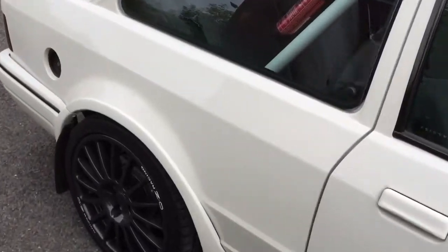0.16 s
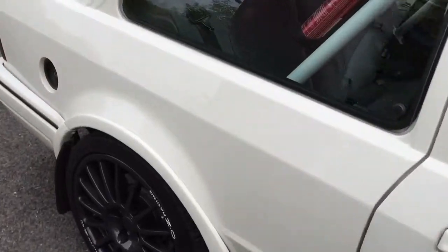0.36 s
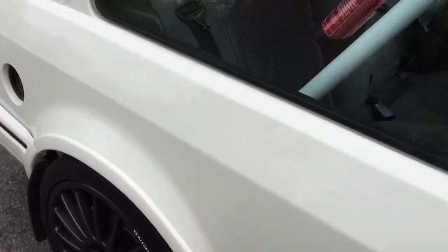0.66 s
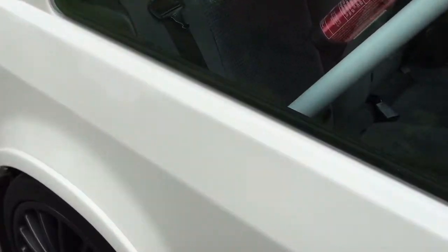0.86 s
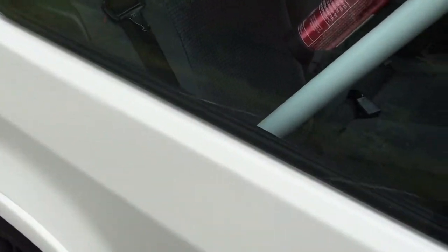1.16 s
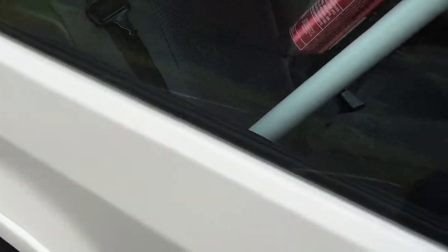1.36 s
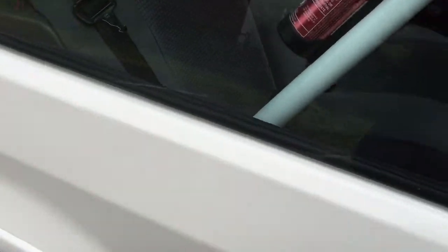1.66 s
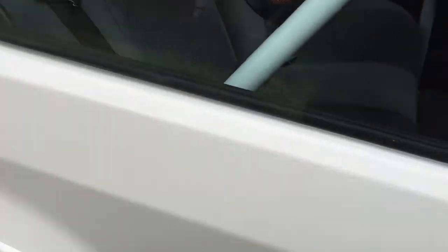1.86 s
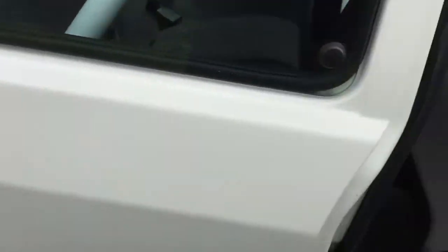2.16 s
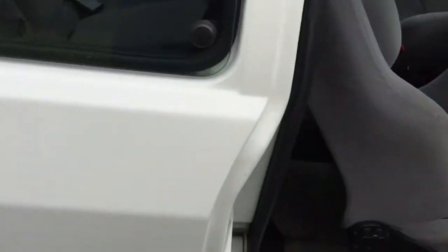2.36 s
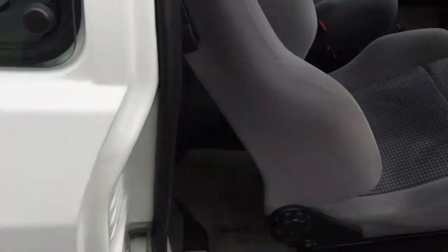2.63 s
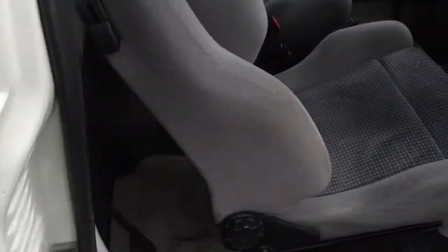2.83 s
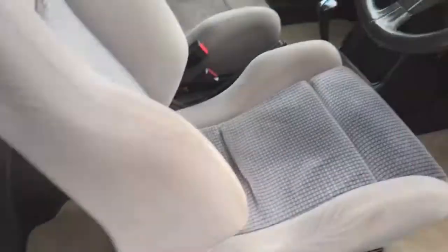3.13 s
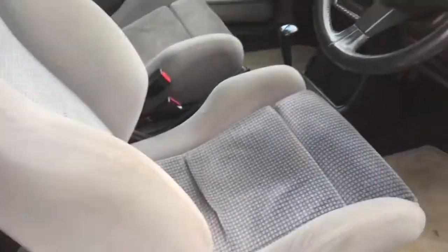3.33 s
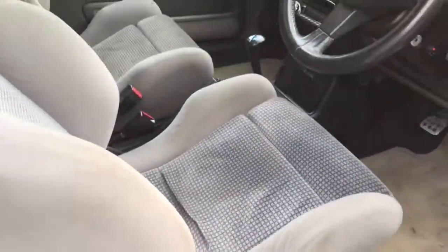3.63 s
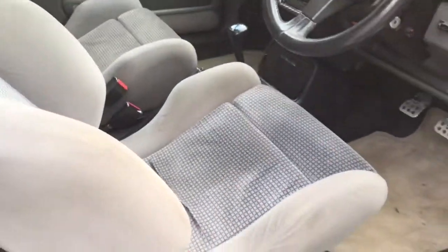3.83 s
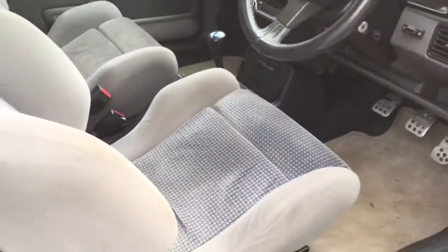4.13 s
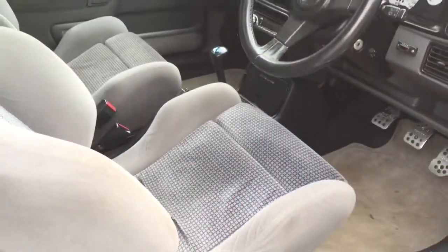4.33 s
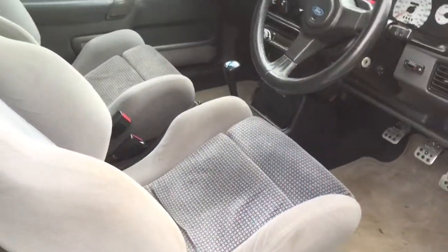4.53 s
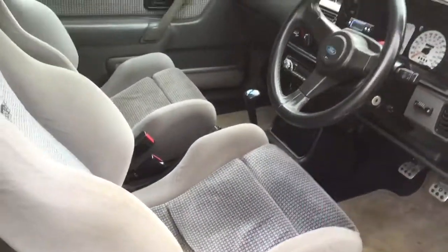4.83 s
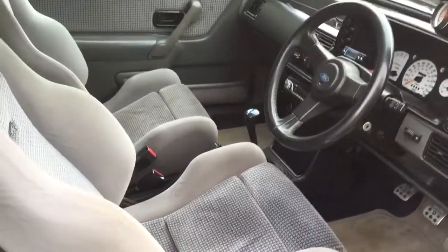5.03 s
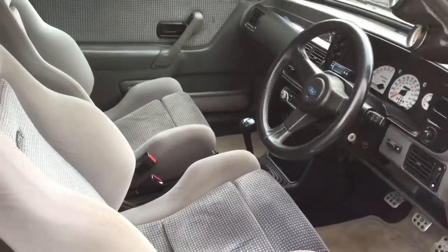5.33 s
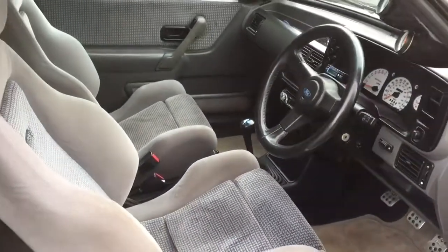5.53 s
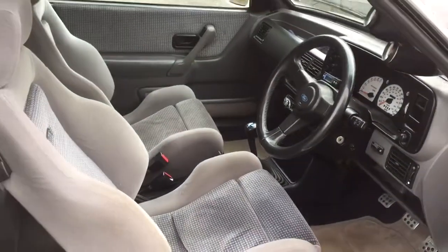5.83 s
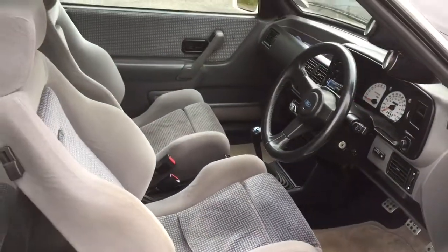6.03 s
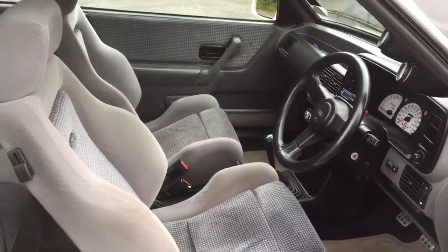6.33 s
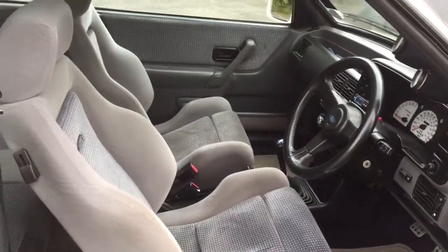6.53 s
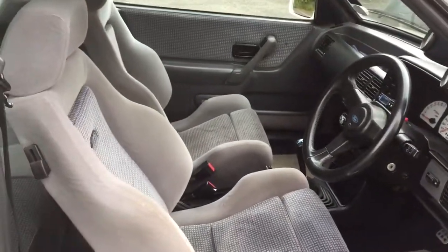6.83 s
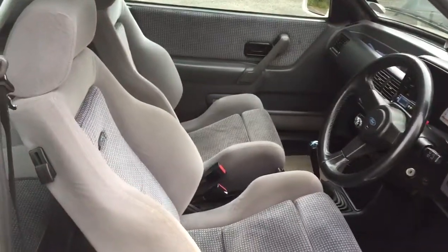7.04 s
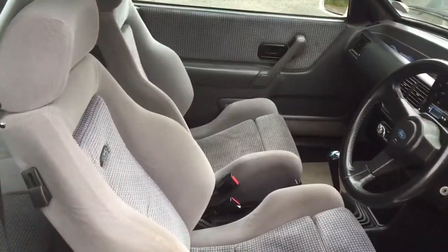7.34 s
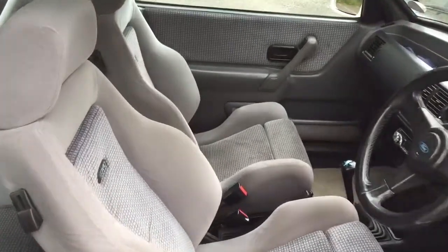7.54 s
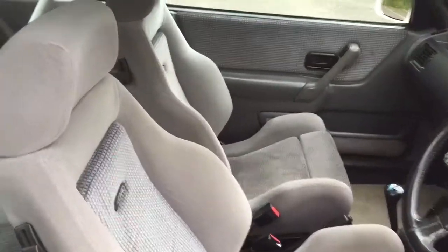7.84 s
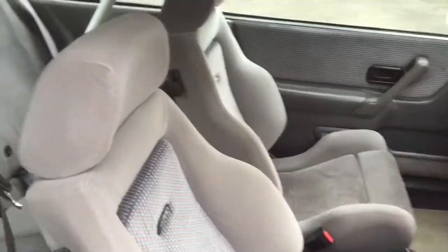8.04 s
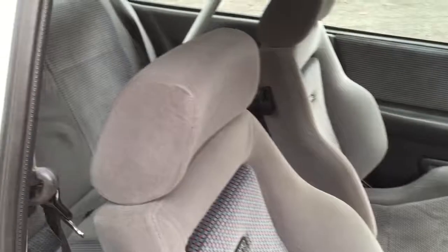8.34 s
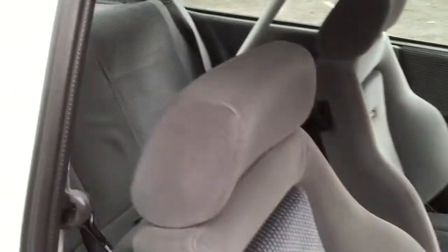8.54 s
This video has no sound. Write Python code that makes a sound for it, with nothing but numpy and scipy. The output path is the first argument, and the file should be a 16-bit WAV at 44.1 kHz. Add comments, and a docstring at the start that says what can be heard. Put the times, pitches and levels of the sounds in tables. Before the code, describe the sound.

A close hand-held phone outdoors, dry, with faint far traffic rumble and a low wavering hum that is strongest near the start. From 0.2 to 0.8 s soft footsteps thud and crunch on gritty tarmac, with dry grain snaps until 1.1 s and a light cloth rustle. At 1.1 s the car door handle clunks and rubs; from 1.2 to 1.5 s steel latch clicks come fast, with hollow door booms, rattle, tiny squeaks and a low air swell. Around 1.9 to 2.1 s a sole scrapes and pebbles knock hard; grit crunches at 2.7. A heavy footfall thuds at 3.0, another scuffs at 3.5, as a sleeve hisses faintly. From 4.3 to 4.65 s a longer gritty scrape ends in a juddering slip. Strong dull thuds fall at 5.2 to 5.4 s. A soft step follows at 6.2, grit and a pebble knock at 7.5, then stone ticks and two footfalls at 8.3 and 8.5 s.

```python
"""A car parked on gritty tarmac in the open, heard close by on a hand-held phone over far traffic and a low hum.
First someone walks up: shoes thud, slap and crunch as grains of grit snap.
Then the handle is lifted and rubs, the latch's steel parts snap, and the door springs free, booming and rattling.
Next the feet step round the open door: soles scuff, judder and crush grit, pebbles knock, a sleeve slides.
Last come a few more footfalls and small stones ticking. Noise bursts, damped modes and filters make it all."""
import sys
import numpy as np
from scipy import signal
from scipy.fft import rfft, irfft
from scipy.io import wavfile
from scipy.ndimage import uniform_filter1d

SR = 44100
rng = np.random.default_rng(int(sys.argv[2]) if len(sys.argv) > 2 else 0)


def file_out(sig):
    """Save sig as 16-bit WAV at sys.argv[1]."""
    # one column per channel
    cols = np.atleast_2d(sig).T
    # limit, then scale
    lim = np.clip(cols, -1, 1)
    pcm = np.round(lim * 32767).astype(np.int16)
    wavfile.write(sys.argv[1], SR, pcm)


N = 383273
TIME = np.arange(N) / SR
AGE = np.arange(SR // 2) / SR  # seconds since a blow

# far traffic: time_s, rumble_db, tyre_wash_db
TRAFFIC = [(0, -41, -45), (1.1, -42, -44), (2.4, -42, -46.5), (4.2, -43.5, -49.5), (6.1, -42, -47.5),
           (7.7, -46.5, -48), (8.69, -45, -46.5)]
# the rumble swells as door and body move near the phone: middle_s, length_s, level_db
BUFFETS = [(.92, 1, -42), (1.36, 0.33, -33), (1.58, 0.38, -38.5), (5.0, 0.14, -39.5), (5.33, 0.53, -36.5)]
# spectrum of the far air: frequency_hz, density_db_per_hz
AIR_COLOUR = [(15, -50), (25, -19), (37, -9), (59, 1.5), (87, 1.5), (117, -3.5), (174, -3.5), (236, -5),
              (277, -11.5), (359, -13), (438, -17), (832, -9), (1550, -14), (2130, -26.5), (3000, -40),
              (3900, -49), (6600, -120)]
# distant hum, before its random waver: time_s, level_db
HUM = [(0, -45), (1.3, -41), (2.5, -61), (6, -51.5), (8.69, -51)]
# clothing rustles with each move: middle_s, length_s, level_db
RUSTLES = [(.7, 0.58, -59), (.985, 0.094, -52), (1.17, 0.24, -53), (1.41, .2, -58.5), (5.36, 0.35, -63.5),
           (5.85, 0.48, -66), (7.12, 0.068, -54.5)]
# spectrum of rubbed clothing: frequency_hz, density_db_per_hz
CLOTH_COLOUR = [(1180, -32), (2000, -5.5), (3120, -12), (3650, -12), (4820, -17.5), (5350, -18),
                (9740, -24.5), (14000, -27.5), (16000, -31)]
# a sleeve slides as the arm reaches forward: middle_s, length_s, level_db
SLIDES = [(3.2, 0.74, -66), (3.6, 0.87, -71)]
# spectrum of the sleeve: frequency_hz, density_db_per_hz
SLEEVE_COLOUR = [(2000, -14), (3300, -2.5), (5000, -3), (6400, -5.5), (7800, -18), (9600, -13),
                 (11500, -24), (15000, -21)]
# small stones ticking against each other: start_s, level_db, pitch_hz
TICKS = [(.39, -57, 3700), (2.847, -58, 3150), (3.39, -63, 5600), (3.8262, -58, 2420), (4.728, -52, 2260),
         (7.409, -59, 2850), (7.543, -53, 4540), (8.0832, -56, 3370), (8.092, -54, 3320),
         (8.2561, -49, 2520)]
# dull bumps as the door swings and weight shifts: start_s, level_db, starting_pitch_hz, t60_s
BUMPS = [(1.242, -37, 194, 0.069), (1.566, -36, 147, 0.092), (5.24, -30, 213, 0.08), (5.287, -33, 175, .06),
         (5.319, -31.5, 135, .11), (5.433, -37, 139, 0.096)]
# lone grains splitting with one dry snap: start_s, level_db, pitch_hz
SNAPS = [(0.6157, -38.5, 4630), (0.7671, -41, 4370), (0.7822, -44.5, 2520), (0.7909, -41.5, 3880),
         (.9629, -41.5, 3980), (1.1291, -40, 3600), (1.1358, -50, 5500), (1.7254, -53.5, 2560)]
# pebbles knocking under a sole: start_s, knock_db, pitch_hz, t60_s
PEBBLES = [(1.944, -34.5, 1300, 0.016), (1.9852, -28.5, 1430, 0.007), (1.9912, -26.5, 1285, 0.012),
           (2.0135, -19, 1180, 0.005), (2.0257, -29, 1145, .02), (2.058, -36, 1720, .02),
           (2.072, -31, 1800, 0.024), (2.0989, -29, 1390, 0.0045), (2.6452, -43, 1540, 0.0047),
           (6.2496, -38.5, 1760, 0.0064), (7.5505, -25.5, 1280, 0.0034)]
# grit crushed under a sole: start_s, crush_db, pitch_hz, hiss_db
GRIT = [(0.7388, -44, 3320, -67), (1.6174, -48, 4380, -53.5), (1.8953, -41.5, 2390, -86),
        (1.955, -59, 4500, -50), (1.9675, -40.5, 3250, -53), (2.175, -80, 8900, -65),
        (2.6562, -41, 3130, -49), (2.7147, -36, 2930, -66), (2.7737, -42.5, 3120, -57),
        (3.4618, -49.5, 6060, -75), (3.473, -47.5, 3170, -63), (3.509, -47, 2830, -57),
        (4.3687, -44.5, 2840, -51.5), (4.3967, -39, 2750, -53), (4.4167, -40.5, 2710, -62),
        (4.4327, -44, 3080, -49), (4.4589, -53, 3600, -48.5), (4.482, -50, 2600, -55),
        (4.5075, -51, 2200, -56), (6.223, -44, 2550, -71), (7.4722, -57.5, 4500, -71),
        (7.492, -53, 4500, -65), (7.5003, -49, 2980, -55.5)]
# soles dragged over tarmac: start_s, build_up_s, hold_s, lift_s, scrape_db, grit_hiss_db, catch_db, catch_hz
SCUFFS = [(1.874, 0.14, 0.1, 0.04, -34, -38, -31.5, 1320),
          (3.525, 0.014, 0.011, 0.027, -41, -45.5, -31.5, 1340),
          (4.336, 0.074, 0.05, 0.19, -39.5, -45.5, -50.5, 2230),
          (4.46, 0.037, .04, .05, -45, -62, -51, 1300), (4.518, 0.074, 0.04, 0.028, -36.5, -37, -39, 1900),
          (5.176, 0.022, 0.029, 0.091, -33, -46.5, -40.5, 1240)]
# spectrum of a scuff: frequency_hz, density_db_per_hz
SCUFF_COLOUR = [(53, -37), (90, 1), (196, 4), (419, -12), (676, -11.5), (1270, -9.5), (1750, -18),
                (2090, -28), (3010, -15), (3590, -27), (4360, -24.5), (7660, -37.5), (15000, -38.5),
                (16000, -43)]
# modes of a dragged sole: frequency_hz, relative_level_db, t60_s
SCRAPE_RING = [(1490, 1, .05), (1716, -3, 0.089), (2280, 1, 0.032), (2944, 5, 0.017), (4520, -5, 0.021),
               (5590, -17, 0.018)]
# a sole sticks and slips at the end of its scrape: start_s, level_db
JUDDER = [(4.6074, -32), (4.6137, -26.5), (4.6178, -26), (4.6208, -37), (4.628, -32.5), (4.6362, -32)]
# footfalls: start_s, sole_slap_db, thud_db, crunch_db, toe_relative_to_heel_db, toe_lag_s,
# starting_thud_pitch_hz, load_t60_s
STEPS = [(.23, -49, -44, -47.5, -10.5, 0.068, 151, 0.086), (.374, -44.5, -60, -53, -15, .015, 167, 0.069),
         (.699, -63, -44, -41, -3, 0.031, 185, 0.1), (3.0253, -38.5, -26.5, -47.5, -12, 0.03, 199.4, 0.16),
         (3.538, -32.5, -40, -48, -2, 0.016, 330, 0.16), (3.745, -46.5, -47, -56, -17, .029, 217, 0.057),
         (4.543, -33.5, -29.5, -36, -1, 0.026, 209, 0.079),
         (5.2135, -39, -21.5, -47, -9.5, 0.022, 263, 0.085),
         (5.372, -52, -38.5, -55.5, -5, 0.022, 470, 0.068),
         (6.221, -55, -42.5, -43.5, -5, 0.027, 192, 0.07), (8.278, -44.5, -40.5, -64, -2, 0.07, 195, 0.24),
         (8.489, -38.5, -34.5, -63.5, -16, 0.021, 200, 0.12)]
# spectrum of a footfall: frequency_hz, density_db_per_hz
STEP_COLOUR = [(60, 3), (115, 11.5), (160, 1.5), (270, 3.5), (420, 0), (580, 0), (800, -10), (1350, -4.5),
               (2000, -14), (3000, -22), (5000, -35.5), (9000, -47.5), (16000, -59)]
# thin squeaks of handle pivot, latch spring and rubber sole: middle_s, length_s, level_db, pitch_hz
SQUEAKS = [(1.0948, .006, -34, 14700), (1.347, 0.0075, -28.5, 4100), (1.465, 0.016, -32, 5150),
           (4.598, .026, -38, 14600), (4.619, .014, -38, 13300)]
# the handle rubs in its recess, then the rubber seal peels away: middle_s, length_s, level_db
RUBS = [(1.115, 0.061, -34), (1.18, 0.057, -41), (1.415, 0.069, -58)]
# handle and latch blows: start_s, steel_db, door_skin_db, door_cavity_db, strongest_steel_hz,
# starting_boom_pitch_hz, rattle_t60_s
LATCH = [(1.0953, -38, -33.5, -30, 2630, 220, 0.13), (1.103, -40.5, -28.5, -35.5, 2630, 240, 0.3),
         (1.199, -24, -36.5, -30.5, 1900, 194, 0.021), (1.2084, -41, -34, -35.5, 2360, 211, 0.053),
         (1.2244, -35, -39.5, -41, 2180, 150, .032), (1.2354, -40.5, -53, -34, 3870, 190, 0.012),
         (1.3034, -33, -28.5, -23.5, 6000, 388, 0.014), (1.328, -37, -40, -39, 3180, 131, .045),
         (1.346, -35, -36, -28, 3920, 150, 0.047), (1.3527, -30, -22, -31, 2980, 710, 0.031),
         (1.377, -59, -57, -31, 2610, 438, .031), (1.4449, -25.5, -30, -34, 5600, 260, 0.033),
         (1.4564, -37, -35, -31, 3500, 203, 0.078), (1.478, -37, -40, -33.5, 2320, 187, 0.032)]
# modes of the steel latch parts: frequency_hz, relative_level_db, t60_s
STEEL = [(1572, 3.5, 0.096), (2410, 3, 0.039), (3294, 4.5, .04), (4030, 6.5, 0.041), (4370, 3.5, 0.023),
         (5190, -7, 0.028), (5940, 1, 0.023), (6470, 9, 0.013), (6900, 5, .02), (8700, -2, .02)]
# modes of door skin and cavity: frequency_hz, relative_level_db, t60_s
DOOR = [(184.6, 5.5, 0.12), (272, 0, 0.065), (366, -1, 0.31), (531, -2.5, 0.2), (614, 0, 0.17),
        (780, 0.5, 0.072), (937, 5.5, .07), (1160, -4, 0.044), (1315, 11, 0.035), (1540, 2, 0.054)]
# spectrum of a latch blow: frequency_hz, density_db_per_hz
LATCH_COLOUR = [(35, -52), (60, 1), (184, -5), (262, -20.5), (371, -0.5), (448, -7), (924, -16),
                (1140, -8.5), (1310, -10.5), (2050, -18), (3850, -14.5), (4750, -24), (8920, -29),
                (16000, -43.5)]
# reflections off the car's trim and glass: delay_s, level_db
MIRRORS = [(.0029, -31), (.0047, -30)]

HUM_HZ = 177.3  # pitch about which the hum wavers
HISS_DB = -69.5  # faint steady hiss under the clothing
SLEEVE_LAG_S, SLEEVE_DRIFT_S_PER_S, SLEEVE_ECHO_DB = .0014, 0.00061, -15  # reflection off the door frame
GRIT_T60_S, GRIT_KNOCK_DB = 0.024, 3  # crunch decay; knock in the sole relative to the crush
CATCH_RATE, CATCH_SPREAD_OCTAVES, CATCH_T60_S = 450, 0.33, 0.0096  # stones per second, pitch scatter, ring
SCRAPE_BUILD_DB, HISS_BUILD_DB = 19, 23.5  # rise of each as weight comes onto the sole
LIFT_DB = 44  # fall over one lift time as the sole leaves the ground
THUD_SAG = 0.17  # share by which the pitch of a thud or bump sinks
FIRST_SHARE = 0.7  # part of a latch blow's energy in its first contact
BOOM_T60_S, BOOM_SAG = 0.075, 0.03  # boom of the hollow door; share by which its pitch sinks
TOP_HZ = 16000  # top of the phone's band


def amp(db):
    """Decibels to gain."""
    return 10 ** (np.asarray(db) / 20)


def unit(x):
    """Scale to rms 1."""
    return x / np.sqrt(np.mean(x ** 2))


def hit(x, db, size=441):
    """Scale a blow so that its loudest moment, 10 ms long by default, has this rms level."""
    loudest = np.sqrt(uniform_filter1d(x ** 2, size, mode="constant").max())
    return x * amp(db) / loudest


def add(out, s, x):
    """Mix x in at time s."""
    i = max(int(s * SR), 0)
    out[i:i + len(x)] += x[:N - i]


def band(x, lo_hz, hi_hz, order=3):
    """Band-pass."""
    edges = [lo_hz, min(hi_hz, SR / 2 - 1000)]
    return signal.sosfilt(signal.butter(order, edges, "band", fs=SR, output="sos"), x)


def colour(x, points, size=4096):
    """Causal minimum-phase filter with the given spectrum, built by folding its cepstrum."""
    hz, db = np.transpose(points)
    bins_hz = np.arange(size // 2 + 1) * SR / size
    gain = amp(np.interp(np.log(bins_hz + 1), np.log(hz), db))
    cepstrum = irfft(np.log(gain))[:size // 2]
    cepstrum[1:] *= 2
    response = irfft(np.exp(rfft(cepstrum, size)))
    return signal.fftconvolve(x, response)[:len(x)]


def fade(t60):
    """Exponential decay of 60 dB in t60 seconds."""
    return np.exp(-np.log(1000) * AGE / max(t60, 1e-3))


def walk(rate):
    """Smooth random drift with a spread near 1 and this many knots a second."""
    knots = rng.standard_normal(1000)
    return np.interp(TIME * rate, np.arange(len(knots)), knots)


def swells(table):
    """Gain of moves that rise and fall smoothly; each row is middle_s, length_s, level_db."""
    gain = 0
    for middle, length, db in table:
        gain = gain + amp(db) * np.cos(np.pi * np.clip((TIME - middle) / length, -.5, .5)) ** 2
    return gain


def grains(count, spread_db):
    """Dense tiny contacts of very unequal size, each size held for 16 samples."""
    sizes_db = spread_db * np.repeat(rng.standard_normal(count // 16 + 1), 16)[:count]
    return unit(rng.standard_normal(count) * amp(sizes_db))


def contact(first_t60, tail_t60, share):
    """A hard first touch and the chatter after it; share is the first touch's part of the energy."""
    share = np.clip(share, .02, .98)
    first = unit(grains(len(AGE), 1.2) * fade(first_t60))
    tail = unit(grains(len(AGE), 1.2) * fade(tail_t60))
    return np.sqrt(share) * first + np.sqrt(1 - share) * tail


def ring(push, modes, scatter_db=2, detune=0.013):
    """Damped modes; each blow lands on another spot, weights them anew and bends their pitch a little."""
    response = np.zeros(len(AGE))
    for hz, db, t60 in modes:
        weight = amp(db + scatter_db * rng.standard_normal()) * rng.choice([-1, 1])
        bent_hz = hz * (1 + detune * rng.standard_normal())
        response += weight * fade(t60) * np.sin(2 * np.pi * bent_hz * AGE)
    return signal.fftconvolve(push, response)[:len(push)]


def favour(modes, struck_hz, slope_db):
    """A blow excites most the modes near its own pitch; slope in dB an octave."""
    return [(hz, db - slope_db * abs(np.log2(hz / struck_hz)), t60) for hz, db, t60 in modes]


def boom(hz, t60, sag):
    """One low resonance whose pitch sinks as it dies away."""
    pitch = hz * (1 - sag * (1 - fade(t60)))
    return np.sin(2 * np.pi * np.cumsum(pitch) / SR) * fade(t60)


def surroundings():
    """Far off: filtered noise for traffic rumble, tyre wash and low buffets, and a wavering sine for the hum."""
    s, *columns = np.transpose(TRAFFIC)
    rumble_db, wash_db = (np.interp(TIME, s, c) for c in columns)
    far = colour(rng.standard_normal(N), AIR_COLOUR)
    rumble_gain = np.hypot(amp(rumble_db + .5 * walk(12.0)), swells(BUFFETS))
    rumble = unit(band(far, 29.0, 418)) * rumble_gain
    wash = unit(band(far, 349, 2330)) * amp(wash_db + 0.15 * walk(3.32))
    hum_db = np.interp(TIME, *np.transpose(HUM)) + 3 * walk(6.6)
    hum_pitch = HUM_HZ * (1 + 0.0356 * walk(18))
    hum = amp(hum_db) * np.sin(2 * np.pi * np.cumsum(hum_pitch) / SR)
    return rumble + wash + hum


def clothing():
    """Cloth rubs in small uneven catches with each move, over a faint steady hiss."""
    rubbing = grains(N, 5) * amp(3.5 * walk(40))
    rustle = unit(band(colour(rubbing, CLOTH_COLOUR), 2200, 12000, order=1))
    hiss = unit(colour(rng.standard_normal(N), CLOTH_COLOUR))
    return rustle * swells(RUSTLES) + hiss * amp(HISS_DB)


def sleeve():
    """Smooth cloth hisses softly; its reflection lags more as the arm moves, so the colour glides down."""
    hiss = colour(rng.standard_normal(N), SLEEVE_COLOUR)
    lag = SLEEVE_LAG_S + SLEEVE_DRIFT_S_PER_S * (TIME - SLIDES[0][0])
    reflection = amp(SLEEVE_ECHO_DB) * np.interp(TIME - lag, TIME, hiss)
    return unit(hiss + reflection) * swells(SLIDES) * amp(2.1 * walk(21.16))


def ticks():
    """A small stone touches another and rings for a moment in one narrow band."""
    out = np.zeros(N)
    for s, db, hz in TICKS:
        tick = band(contact(0.0094, 0.029, 0.33), hz / 1.3, hz * 1.11, order=2)
        add(out, s, hit(tick, db))
    return out


def bumps():
    """Soft low knocks that swell for a moment and roll away."""
    out = np.zeros(N)
    for s, db, hz, t60 in BUMPS:
        bump = boom(hz, t60, THUD_SAG) * (1 - fade(.02))
        add(out, s, hit(bump, db))
    return out


def snaps():
    """One grain gives way all at once: a single sharp pulse."""
    out, pulse = np.zeros(N), signal.unit_impulse(len(AGE))
    for s, db, hz in SNAPS:
        crack = band(band(pulse, hz / 2.0, hz * 1.23, order=1), 1400, 9400, order=3)
        add(out, s, hit(crack, db))
    return out


def pebbles():
    """A pebble tips under the sole: a knock of a few cycles, then a short dull rattle."""
    out = np.zeros(N)
    for s, db, hz, t60 in PEBBLES:
        knock = np.sin(2 * np.pi * hz * AGE) * (1 - fade(t60)) * fade(t60)
        rattle = band(contact(0.0095, 0.035, 0.64), 560, 1500, order=2)
        add(out, s, hit(knock, db))
        add(out, s + .0019, amp(-8) * hit(rattle, db))
    return out


def grit():
    """Grit breaks in a few quick cracks that ring the sole, with a splinter of hiss, a knock and crumbs."""
    out = np.zeros(N)
    for s, db, hz, hiss_db in GRIT:
        crack = grains(len(AGE), 3) * fade(GRIT_T60_S) * (1 - fade(GRIT_T60_S / 5))
        # three pulses of alternating sign, about a millisecond apart
        breaks = np.zeros(len(AGE))
        for k, (late, force) in enumerate(rng.uniform(size=(3, 2))):
            add(breaks, .0003 + (k + late / 2) * .0011, [(-1) ** k * amp(-6 * force)])
        crumbs = grains(len(AGE), 5) * fade(4 * GRIT_T60_S)
        crush = unit(crack) + amp(3) * unit(breaks) + amp(-0.5) * unit(crumbs)
        sole = ring(crush, favour(SCRAPE_RING, hz, 7))
        body = unit(band(crush, hz / 2, hz * 1.2, order=3)) + amp(-4) * unit(sole)
        hiss = band(crush, 5000, 13000)
        knock = band(crush, 610, 2040, order=2)
        add(out, s, hit(body, db) + hit(hiss, hiss_db) + hit(knock, db + GRIT_KNOCK_DB))
    return out


def catches(hz, count=260, size=1500):
    """Stones catch and let go under a sliding sole; each rings briefly at its own pitch."""
    out, age = np.zeros(N), AGE[:size]
    decay = np.exp(-np.log(1000) * age / CATCH_T60_S)
    for k, (late, pitch, force) in enumerate(rng.standard_normal((count, 3))):
        stone_hz = hz * 2 ** (CATCH_SPREAD_OCTAVES * pitch)
        knock = np.sin(2 * np.pi * stone_hz * age) * decay
        add(out, (k + late / 2) / CATCH_RATE, amp(2.5 * force) * knock)
    return unit(out[:len(AGE)])


def scuffs():
    """Soles drag in uneven slips and catch on stones: weight comes on, holds, and the foot lifts."""
    out = np.zeros(N)
    for s, build, hold, lift_s, scrape_db, hiss_db, catch_db, catch_hz in SCUFFS:
        unloaded = np.maximum(1 - AGE / build, 0)
        lift = amp(-LIFT_DB * np.maximum(AGE - build - hold, 0) / lift_s)
        grip = amp(2.2 * walk(120)[:len(AGE)])
        slips = grains(len(AGE), 3.5) * grip
        rough = colour(slips, SCUFF_COLOUR)
        scrape = unit(band(rough, 112, 3540)) + amp(-17.5) * unit(ring(slips, SCRAPE_RING))
        hiss = unit(band(rough, 2820, 15000))
        body = scrape * amp(scrape_db) + catches(catch_hz) * amp(catch_db)
        loaded_body = body * amp(-SCRAPE_BUILD_DB * unloaded)
        loaded_hiss = hiss * amp(hiss_db - HISS_BUILD_DB * unloaded)
        add(out, s, lift * (loaded_body + loaded_hiss))
    return out


def judder():
    """The long scrape ends in a few quick, dry slips that briefly ring the sole."""
    out = np.zeros(N)
    for s, db in JUDDER:
        slip = contact(0.0034, 0.018, 0.65)
        rasp = unit(band(colour(slip, SCUFF_COLOUR), 1230, 11000, order=2))
        sole = unit(ring(slip, SCRAPE_RING))
        add(out, s, hit(rasp + amp(2) * sole, db))
    return out


def steps():
    """Heel, then toe: each thuds, the sole slaps and rolls down, and grit crunches under it."""
    out = np.zeros(N)
    for s, sole_db, thud_db, crunch_db, toe_db, toe_lag, thud_hz, t60 in STEPS:
        for lag, weight in ((0, 1), (toe_lag, amp(toe_db))):
            load = (1 - fade(0.0029)) * fade(t60)
            tread = colour(grains(len(AGE), 4.5) * load, STEP_COLOUR)
            dull_noise = rng.standard_normal(len(AGE)) * fade(1.9 * t60)
            shake = band(colour(dull_noise, STEP_COLOUR), 74, 730, order=2)
            resonance = boom(thud_hz, 1.24 * t60, THUD_SAG) * (1 - fade(0.0057))
            thud = hit(unit(shake) + amp(0.7) * unit(resonance), thud_db)
            slap = hit(band(tread, 536, 2300), sole_db)
            crunch = hit(band(tread, 3350, 21050), crunch_db)
            add(out, s + lag, weight * (thud + slap + crunch))
    return out


def squeaks():
    """Surfaces that stick and slip very fast sing for a moment in one narrow band."""
    out = np.zeros(N)
    for middle, length, db, hz in SQUEAKS:
        tone = unit(band(rng.standard_normal(N), hz / 1.05, hz * 1.05, order=2))
        out += swells([(middle, length, db)]) * tone
    return out


def handle():
    """The handle rubs in its recess and the rubber seal peels off the door frame, in slips that ring the door."""
    slips = grains(N, 4.5)
    rough = unit(band(colour(slips, LATCH_COLOUR), 600, 3800))
    ringing = unit(band(ring(slips, DOOR + STEEL), 600, 3500, order=2))
    return unit(rough + amp(-10) * ringing) * swells(RUBS)


def door():
    """Steel latch parts snap and rattle; each blow also shakes the door skin and booms in the hollow door."""
    out = np.zeros(N)
    for s, steel_db, skin_db, cavity_db, steel_hz, boom_hz, t60 in LATCH:
        push = contact(0.012, t60, FIRST_SHARE)
        snap = unit(band(colour(push, LATCH_COLOUR), 1600, 17000))
        steel = snap + amp(-1) * unit(ring(push, favour(STEEL, steel_hz, 6)))
        shake = colour(contact(0.011, 0.28, FIRST_SHARE), LATCH_COLOUR)
        skin_ring = unit(band(ring(push, DOOR), 580, 2200))
        skin = unit(band(shake, 700, 2600)) + amp(-2) * skin_ring
        # the heavy door takes the blow as one short shove
        shove = ring(fade(0.0027), favour(DOOR, boom_hz, 7.6))
        cavity = unit(band(shake, 67, 560, order=2))
        cavity += amp(5) * unit(band(shove, 55, 900, order=2))
        cavity += amp(1.5) * unit(boom(boom_hz, BOOM_T60_S, BOOM_SAG))
        add(out, s, hit(steel, steel_db) + hit(skin, skin_db) + hit(cavity, cavity_db))
    return out


def mirrored(x):
    """Small hard surfaces send the short waves back a few milliseconds later."""
    out, bright = x.copy(), band(x, 1400, 13000, order=1)
    for delay, db in MIRRORS:
        add(out, delay, amp(db) * bright)
    return out


def scene():
    """Near sounds in the open air, with a faint scatter from the car and the yard."""
    near = mirrored(door() + steps() + scuffs() + judder())
    near += handle() + squeaks() + grit() + ticks() + pebbles() + bumps()
    scatter = rng.standard_normal(len(AGE)) * fade(0.13) * (1 - fade(0.0082))
    yard = band(scatter, 102, 5940, order=1)
    echo = signal.fftconvolve(near, yard / np.linalg.norm(yard))[:N]
    return (near + amp(-16.5) * echo + snaps() + clothing() + sleeve() + surroundings())[None]


def record(dry):
    """The phone cuts the top with a steep low-pass."""
    return signal.sosfilt(signal.ellip(10, .2, 80, TOP_HZ, fs=SR, output="sos"), dry)


dry = scene()
out = record(dry)
file_out(out)
```